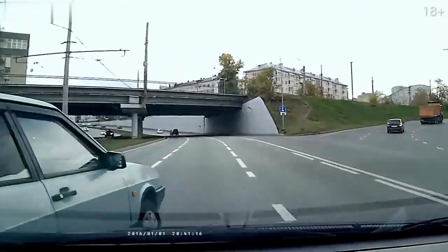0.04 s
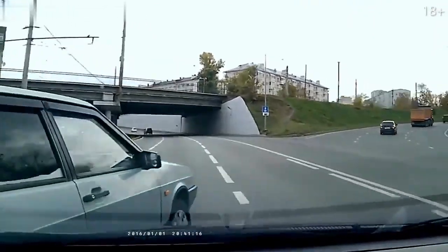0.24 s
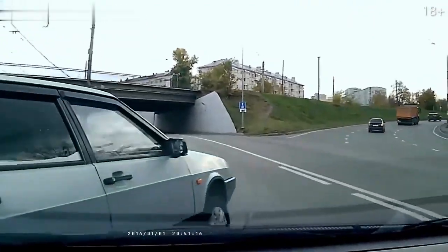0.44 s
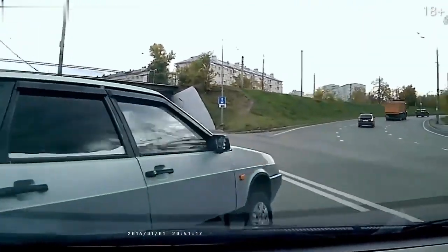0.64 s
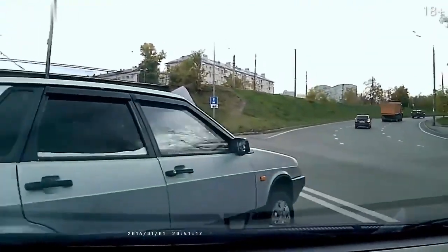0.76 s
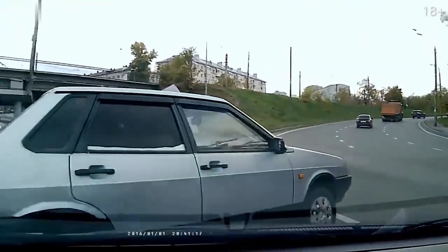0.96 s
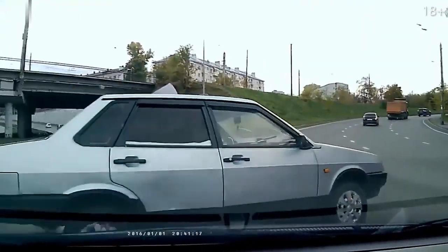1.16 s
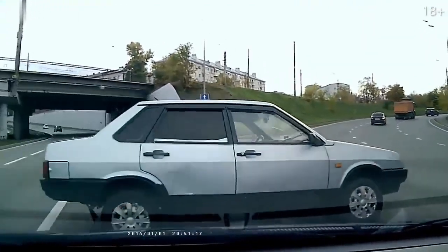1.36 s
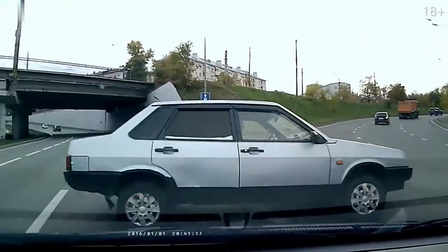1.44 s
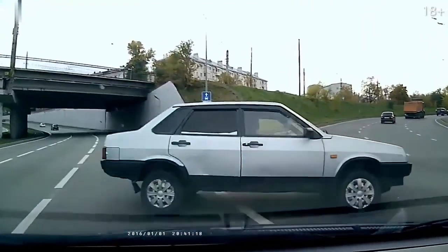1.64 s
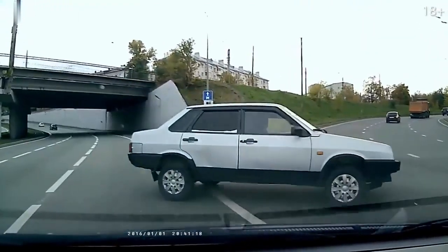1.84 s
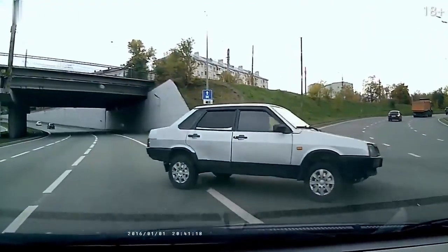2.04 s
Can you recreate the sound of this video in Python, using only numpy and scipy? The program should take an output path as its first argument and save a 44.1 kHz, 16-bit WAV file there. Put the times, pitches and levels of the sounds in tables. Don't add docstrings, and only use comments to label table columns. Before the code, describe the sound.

A car crash from inside the cabin. Low road rumble for 0.2 s, then metal crumples into a clipped, crunching bang at 0.24 s, with ringing panels and a second deep blow near 0.3. Rumbling shudder and tyre scrub follow; wavering squeals grow from 0.6, strongest around 1.3. A heavy slam hits at 1.36, then squeal, small knocks and ticks continue, fading toward 2.1 s.

```python
import sys
import numpy as np
from scipy import signal
from scipy.fft import rfft, irfft
from scipy.io import wavfile
from scipy.ndimage import uniform_filter1d

SR = 44100
rng = np.random.default_rng(int(sys.argv[2]) if len(sys.argv) > 2 else 0)


def ratio(d):
    e = np.asarray(d, float) / 20
    return 10 ** e


def dump(signal):
    limited = np.clip(np.atleast_2d(signal).T, -1, 1)
    pcm = np.round(limited * 32767).astype(np.int16)
    wavfile.write(sys.argv[1], SR, pcm)


N = 92610
TIME = np.arange(N) / SR
CONTACT_S, BLOW_S = 0.21, 0.241


def noise():
    return rng.standard_normal(N)


def rms_one(x):
    return x / np.sqrt(np.mean(x ** 2) + 1e-20)


def in_time(rows):
    seconds, *columns = np.transpose(rows)
    return [np.interp(TIME, seconds, column) for column in columns]


def drift(rate_hz):
    r = np.exp(-20 * np.pi * rate_hz / SR)
    slow = signal.lfilter([1], [1, -2 * r, r * r], rng.standard_normal(N // 10 + 2002))
    slow = rms_one(slow[2000:])
    return np.interp(np.arange(N) / 10, np.arange(len(slow)), slow)


def envelope(start_s, swell_s, hold_s, t60_s):
    since = TIME - start_s
    swell_s = max(swell_s, 1e-4)
    falling_s = np.maximum(since - swell_s - hold_s, 0)
    return np.clip(since / swell_s, 0, 1) * ratio(-60 * falling_s / max(t60_s, 1e-3))


def step_in(start_s, swell_s):
    return envelope(start_s, swell_s, 9, 1)


def resonance(x, hz, width_hz):
    r = np.exp(-np.pi * width_hz / SR)
    feedback = [1, -2 * r * np.cos(2 * np.pi * hz / SR), r * r]
    return signal.lfilter([(1 - r * r) / 2, 0, (r * r - 1) / 2], feedback, x)


def narrow(hz, width_hz):
    once = resonance(noise(), hz, width_hz)
    return rms_one(resonance(once, hz, width_hz))


def bank(x, peaks):
    total = 0
    for k, (hz, width_hz, db) in enumerate(peaks):
        total = total + (-1) ** k * ratio(db) * resonance(x, hz, width_hz) / np.sqrt(width_hz)
    return rms_one(total)


def coloured(x, spectrum):
    hz, db = np.transpose(spectrum)
    f = np.maximum(np.arange(N // 2 + 1) * SR / N, 1)
    gain = ratio(np.interp(np.log(f), np.log(hz), db, left=-90, right=-90))
    return rms_one(irfft(rfft(x) * gain, N))


def grit(spread_db):
    return rms_one(noise() * ratio(spread_db * drift(197)))


# (frequency [Hz], level [dB per Hz])
ROAD_RUMBLE = [(12, -50), (22, 3), (42, -0.5), (70, -10.5), (175, -7), (269, -34.5), (334, -14.5),
               (420, -42), (550, -83)]
# (frequency [Hz], level [dB per Hz])
WIND_MURMUR = [(240, -36), (400, -5), (464, -12.5), (1140, -13.5), (1870, -26.5), (5000, -43), (6800, -52),
               (15600, -52)]
# (frequency [Hz], width [Hz], level [dB])
ELECTRIC_HISS = [(5650, 640, -73.5), (9300, 800, -81), (12740, 1100, -79)]


def road():
    rumble = ratio(-29.5 + 5.0 * drift(4.0)) * coloured(noise(), ROAD_RUMBLE)
    murmur = ratio(-53.5 + 1.7 * drift(26)) * coloured(noise(), WIND_MURMUR)
    hiss = sum(ratio(db) * narrow(hz, width_hz) for hz, width_hz, db in ELECTRIC_HISS)
    duck_db = -6 * step_in(BLOW_S, 0.0091)
    return ratio(duck_db) * (rumble + murmur + hiss)


# (frequency [Hz], level [dB per Hz])
CRUMPLE = [(120, -26), (200, 10), (864, -5.5), (1020, -5), (1360, -6.5), (1570, -6.5), (2020, -19),
           (2850, -17), (15000, -77)]
# (frequency [Hz], width [Hz], level [dB])
PANEL_RINGS = [(509, 17, -6), (727, 47, 12.5), (981.3, 29, 4.5), (1450, 34, -4.5), (1780, 49, -24),
               (2170, 38, -12.5), (3000, 50, -30), (3570, 87, -23), (6240, 110, -57)]


def crush(contacts):
    rise_db = np.interp(TIME, [CONTACT_S, BLOW_S], [-33, -13.5])
    rise = ratio(rise_db) * step_in(CONTACT_S, 0.0013)
    fall = ratio(-60 * np.maximum(TIME - BLOW_S - .008, 0) / 0.15)
    tail = ratio(-31.5) * envelope(BLOW_S, 0.046, 0, t60_s=0.91)
    metal = coloured(contacts, CRUMPLE) + ratio(-5) * bank(contacts, PANEL_RINGS)
    return (rise * fall + tail) * metal


def snap(contacts):
    first = envelope(.2345, 0.00038, 0.00034, t60_s=.009)
    second = 0.63 * envelope(BLOW_S, 0.00062, 0, t60_s=.009)
    crack = rms_one(resonance(contacts, 14000, 4500) + 1.2 * resonance(contacts, 5800, 1000))
    return ratio(-22) * (first + second) * crack


# (time [s], level [dB], frequency [Hz], hold [s], t60 [s])
SPRING_LURCHES = [
    (.233, -7, 34.5, .056, .03),
    (.299, -9, 26, .04, .15),
]


def lurch():
    total = 0
    for s, db, hz, hold_s, t60_s in SPRING_LURCHES:
        swing = -np.sin(2 * np.pi * hz * (TIME - s))
        total = total + swing * ratio(db) * envelope(s, 0.004, hold_s, t60_s)
    return total


# (frequency [Hz], width [Hz], level [dB])
WING_RINGS = [(749, 43, -1.5), (1019.4, 62, -5), (1560, 89, -8.5)]


def bang():
    strike = envelope(.2425, 0.0007, 0.0064, t60_s=0.034)
    rebound = ratio(-4) * envelope(.259, 0.00054, 0.0043, t60_s=0.034)
    return ratio(-7) * (strike + rebound) * bank(noise(), WING_RINGS)


def collision():
    contacts = grit(spread_db=1.5)
    return crush(contacts) + snap(contacts) + lurch() + bang()


# (time [s], level [dB], frequency [Hz], t60 [s])
SMALL_TICKS = [(.2165, -52, 4860, .02), (.226, -68, 11100, .04), (0.2417, -31, 4380, 0.0082),
               (.2477, -20, 2550, 0.0098), (0.2504, -36, 3460, 0.0087), (0.26, -37, 3060, 0.013),
               (.2645, -49, 5000, 0.011), (1.077, -41.5, 3860, 0.05), (1.0765, -56, 9300, .04),
               (1.106, -61, 5050, .03), (1.356, -62, 6206, .02), (1.366, -47, 5640, 0.028),
               (1.372, -55, 4660, 0.023), (1.38, -58, 9630, 0.089), (1.437, -64, 9400, 0.069),
               (1.46, -56, 9300, 0.048), (1.766, -53, 5600, 0.12), (1.768, -60, 13700, 0.045),
               (1.804, -56, 8900, 0.045), (1.812, -57, 9600, 0.065), (1.859, -59, 6304, 0.072),
               (2.041, -59, 5870, 0.099), (2.043, -62.5, 9300, 0.072)]


def ticks():
    contacts = grit(spread_db=2.0)
    total = 0
    for s, db, hz, t60_s in SMALL_TICKS:
        ring = rms_one(resonance(contacts, hz, width_hz=340))
        total = total + ratio(db) * envelope(s, 0.00066, 0.001, t60_s) * ring
    return total


# (time [s], peak level [dB], frequency [Hz], hold [s], t60 [s])
FLOOR_THUDS = [(0.247, -14.5, 276.5, 0.012, 0.19), (.236, -11, 141, .03, 0.078),
               (.33, -17.5, 124.1, 0.012, 0.6), (0.537, -24.5, 124, 0.023, 0.37),
               (0.671, -26.5, 119, 0.027, 0.076), (0.897, -24, 117, 0.0068, 0.079),
               (.95, -18.5, 201.2, 0.015, 0.24), (1.135, -18, 143.6, 0.025, 0.031),
               (1.237, -19.5, 219, 0.0049, 0.092), (1.321, -15, 125, 0.0096, 0.11),
               (1.386, -17.5, 125.6, 0.0069, 0.073), (1.56, -21, 204.7, 0.024, 0.17),
               (1.609, -18, 120.6, 0.027, 0.18), (1.797, -20, 124, 0.025, 0.089),
               (1.905, -30.5, 115, 0.035, .08), (.74, -27, 199.1, 0.093, .1)]


def thuds():
    waver = 0.76 * drift(15.0)
    total = 0
    for s, db, hz, hold_s, t60_s in FLOOR_THUDS:
        tone = np.sin(2 * np.pi * hz * (TIME - s) + waver)
        total = total + ratio(db) * envelope(s, 0.011, hold_s, t60_s) * tone
    return total


# (time [s], shudder level [dB], tyre scrub level [dB])
SKID_LEVELS = [
    (.3, -22, -39),
    (.39, -23, -38),
    (.44, -35, -50.5),
    (.58, -27, -35),
    (.8, -26.5, -36),
    (1.2, -33.5, -38),
    (1.45, -32.5, -38.5),
    (1.78, -45, -41.5),
    (2.1, -52, -48.5),
]
# (frequency [Hz], width [Hz], level [dB])
CABIN_BOOMS = [(119.37, 14.3, 3), (170.9, 14, -5), (209.7, 31, -4), (338, 143, -13), (74.5, 120, -9.5)]
# (frequency [Hz], level [dB per Hz])
TYRE_SCRUB = [(140, -29.5), (230, 1.5), (356, -18), (463, -10.5), (1150, -12.5), (1870, -24.5),
              (2900, -31.5), (4990, -50), (15000, -62)]


def skid():
    shudder_db, scrub_db = in_time(SKID_LEVELS)
    boom = 0
    for hz, width_hz, db in CABIN_BOOMS:
        boom = boom + ratio(db + 5.0 * drift(29)) * narrow(hz, 0.52 * width_hz)
    scrub = ratio(0.47 * drift(20)) * coloured(grit(spread_db=1.5), TYRE_SCRUB)
    return step_in(BLOW_S, 0.0069) * (ratio(shudder_db) * rms_one(boom) + ratio(scrub_db) * scrub)


# (time [s], peak level [dB], frequency [Hz], hold [s], t60 [s])
BODY_SLAMS = [
    (.2435, -8, 62, .022, .03),
    (.2925, -11, 128, .02, .15),
    (1.1748, -22, 470, .002, .03),
    (1.213, -29, 540, .004, .03),
    (2.04, -30, 430, .006, .04),
    (1.3617, -6, 158, .011, .07),
    (1.3622, -8, 390, .004, .03),
    (1.364, -17, 290, .006, .05),
]


def slams():
    total = 0
    for s, db, hz, hold_s, t60_s in BODY_SLAMS:
        swing = -np.sin(2 * np.pi * hz * (TIME - s))
        total = total + ratio(db) * envelope(s, 0.00079, hold_s, t60_s) * swing
    return total


# (time [s], pitch [Hz], level [dB], overtones [dB])
FRONT_SQUEAL = [
    (.3, 1141, -43.5, -8),
    (.85, 1131, -39, -6),
    (1.12, 1130, -38.5, -6),
    (1.2, 1089, -47, 4),
    (1.28, 1113, -32.5, 0),
    (1.345, 1115, -31.5, -6),
    (1.37, 1150, -56, 12),
]
REAR_SQUEAL = [
    (.6, 941, -46, -5.5),
    (.95, 965, -35.5, -6),
    (1.25, 959.4, -37.5, 6),
    (1.3, 947, -46, 9),
    (1.42, 949, -41, 11),
    (1.7, 910, -35, -4.5),
    (1.85, 970, -35, -3.5),
    (2.04, 1013, -38, -7),
    (2.1, 1045, -51, -21),
]
OVERTONES_DB = [-11, -14, -30]


def squeal(rows):
    hz, db, bright_db = in_time(rows)
    wander = .025 * (1.5 * drift(204.5) + 0.194 * drift(8.7))
    phase = 2 * np.pi * np.cumsum(hz * (1 + wander)) / SR
    tone = np.sin(phase)
    for order, order_db in enumerate(OVERTONES_DB, start=2):
        tone = tone + ratio(order_db + bright_db) * np.sin(order * phase)
    flutter_db = 5 * np.minimum(drift(35), 1)
    return 0.57 * ratio(db + flutter_db) * tone * step_in(rows[0][0], 0.014)


# (time [s], level [dB])
SPRING_SWAY = [
    (.36, -23.5),
    (.4, -24.5),
    (.86, -27),
    (.93, -20),
    (1.01, -39.5),
    (1.07, -24.5),
    (1.55, -32),
    (1.9, -32),
    (2.1, -31),
]


def sway():
    throb = narrow(35, 25.4)
    even = throb / np.sqrt(uniform_filter1d(throb ** 2, size=4000) + 0.098)
    return even * ratio(in_time(SPRING_SWAY)[0]) * step_in(SPRING_SWAY[0][0], 0.011)


# (time [s], bright level [dB], dull level [dB], swell [s], length [s])
LOOSE_KNOCKS = [(0.49, -51, -55, 0.0029, 0.0055), (0.986, -61, -55, 0.0022, 0.035),
                (1.083, -51, -62, 0.0012, 0.0051), (1.109, -57, -62, 0.0015, .008),
                (1.172, -42.5, -20.5, 0.0018, 0.0059), (1.224, -77, -35.5, 0.00067, 0.0083),
                (1.354, -70, -28.5, 0.00058, 0.0073), (1.36, -53.5, -27, 0.0011, 0.013),
                (1.373, -47, -37, 0.0049, 0.0074), (1.427, -44, -28.5, 0.011, 0.03),
                (1.617, -65.5, -36, 0.013, 0.051), (1.713, -45.5, -28.5, 0.0019, 0.021),
                (1.748, -71, -40, 0.0089, 0.021), (1.788, -48, -39, 0.018, 0.023),
                (1.855, -52, -63, 0.0034, 0.012), (1.887, -69, -64, 0.0091, 0.013),
                (1.686, -65, -45, .015, 0.009), (1.9276, -41.5, -30.5, 0.0015, 0.0053),
                (2.034, -66, -42, 0.0024, 0.014)]
# (frequency [Hz], level [dB per Hz])
CHATTER = [(900, 2), (2600, 0), (4200, -3), (7500, -14), (9400, -11), (13500, -15), (15500, -28)]
# (frequency [Hz], width [Hz], level [dB])
CHATTER_RINGS = [(3660, 380, -0.5), (5170, 320, 15.5), (9050, 500, -8)]
# (frequency [Hz], width [Hz], level [dB])
PLASTIC_BODY = [(350, 140, 0), (480, 160, -1), (720, 200, -4), (1500, 900, -9), (2800, 1200, -15)]


def knocks():
    contacts = grit(spread_db=2.0)
    bright = coloured(contacts, CHATTER) + 0.19 * bank(contacts, CHATTER_RINGS)
    body = bank(contacts, PLASTIC_BODY)
    body = body / np.sqrt(uniform_filter1d(body ** 2, size=600) + 0.27)
    total = 0
    for s, bright_db, dull_db, swell_s, length_s in LOOSE_KNOCKS:
        sag = ratio(-6 * step_in(s + swell_s, length_s))
        burst = envelope(s, swell_s, length_s, t60_s=.07) * sag
        echo = ratio(-16) * envelope(s, swell_s, length_s, t60_s=.25)
        total = total + (burst + echo) * (ratio(bright_db) * bright + ratio(dull_db) * body)
    return total


def scene():
    crash = collision() + ticks() + thuds() + slams()
    sliding = skid() + squeal(FRONT_SQUEAL) + squeal(REAR_SQUEAL) + sway()
    return (road() + crash + sliding + knocks())[None]


def roll_off(x):
    return signal.sosfilt(signal.butter(12, 16510, fs=SR, output="sos"), x)


def record(dry):
    overload, offset, cutoff_hz = .385, .0075, 15500
    clipped = np.clip(dry + offset, -overload, overload)
    low_pass = signal.cheby2(12, 60, cutoff_hz * 1.035, fs=SR, output="sos")
    mix = signal.sosfilt(low_pass, clipped)
    return roll_off(mix)


dry = scene()
out = record(dry)
dump(out)
```